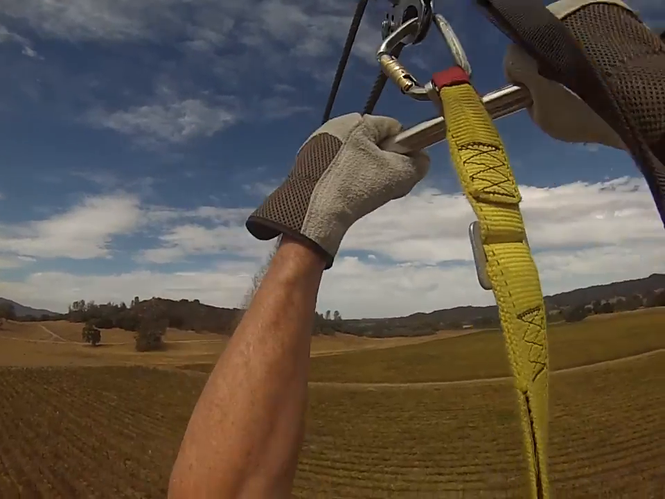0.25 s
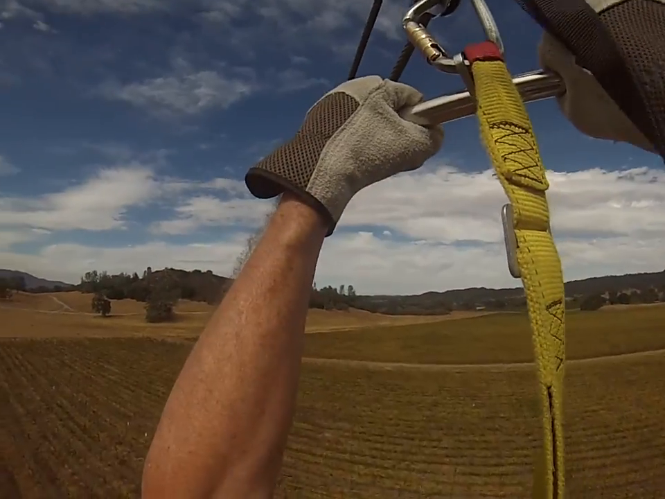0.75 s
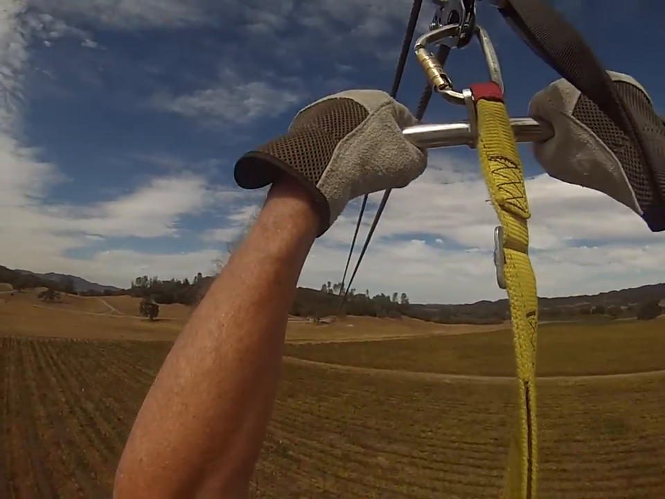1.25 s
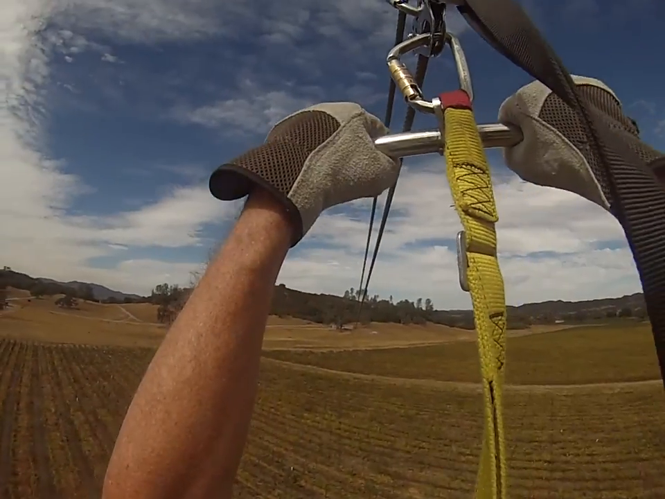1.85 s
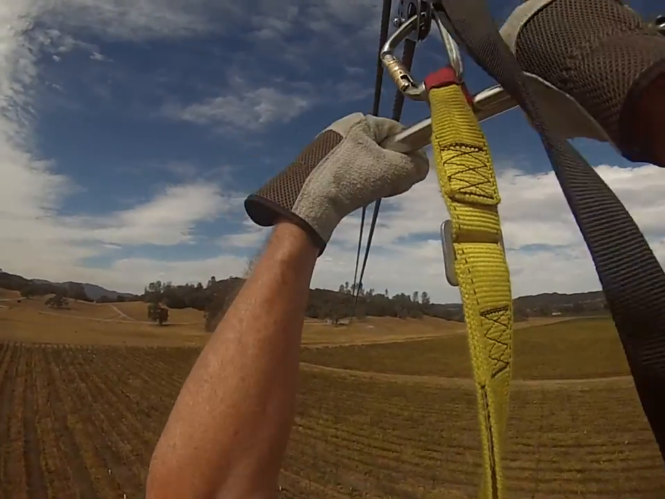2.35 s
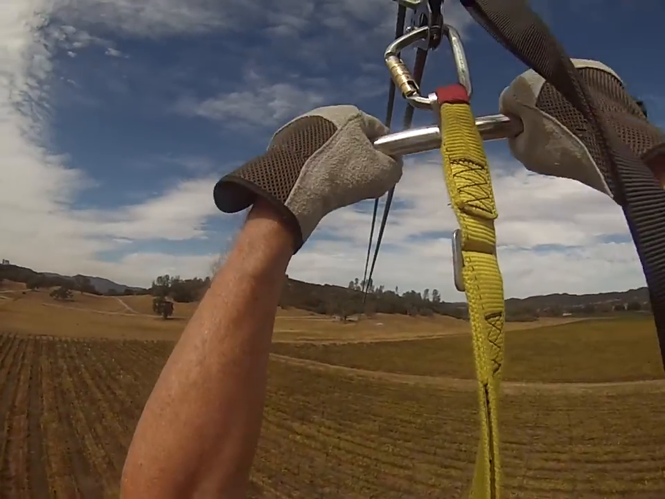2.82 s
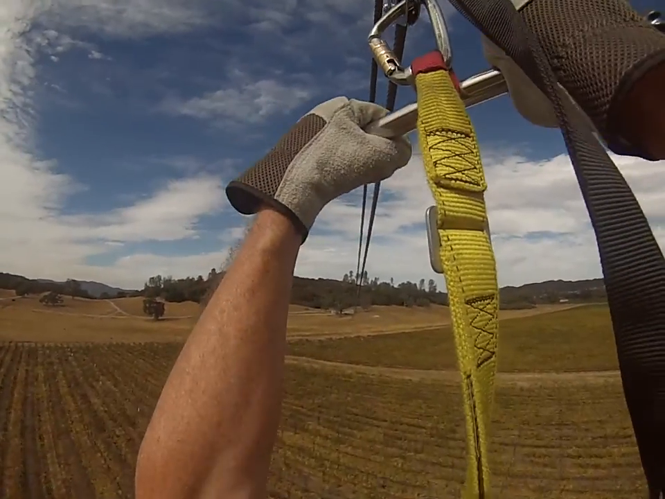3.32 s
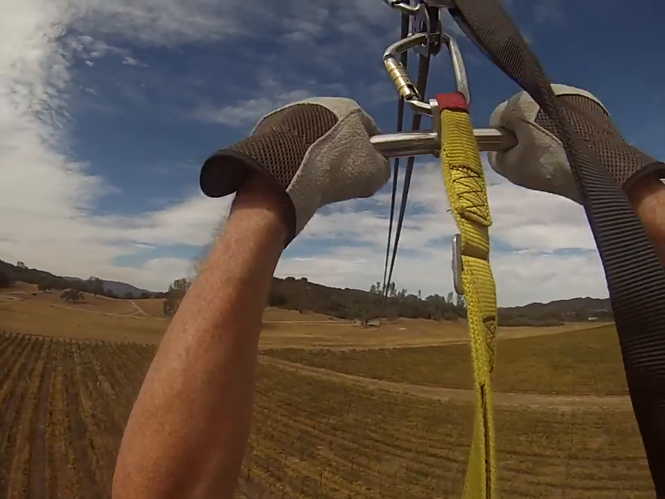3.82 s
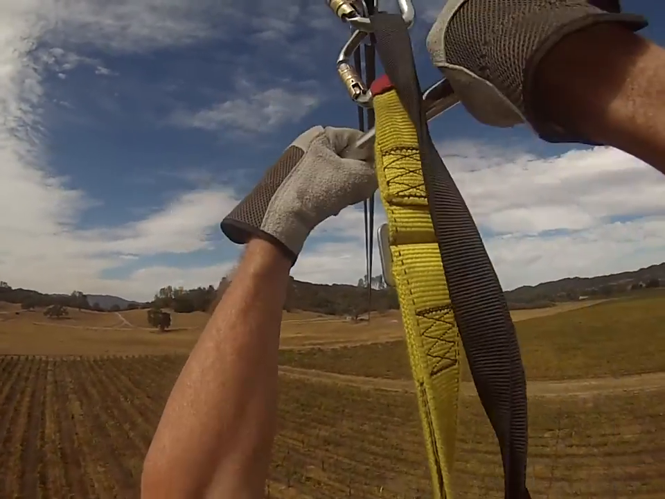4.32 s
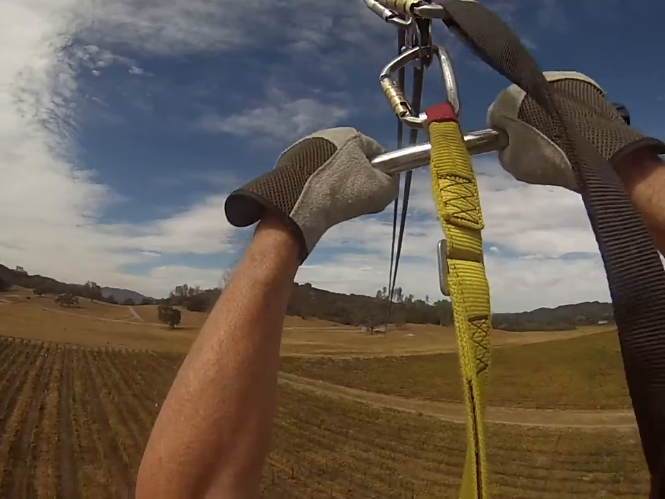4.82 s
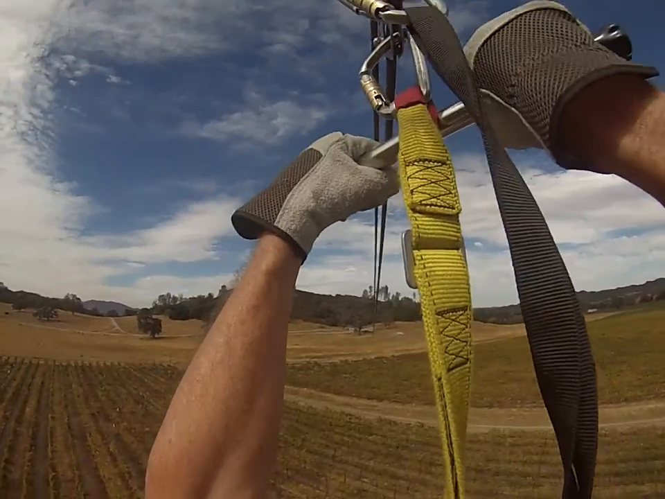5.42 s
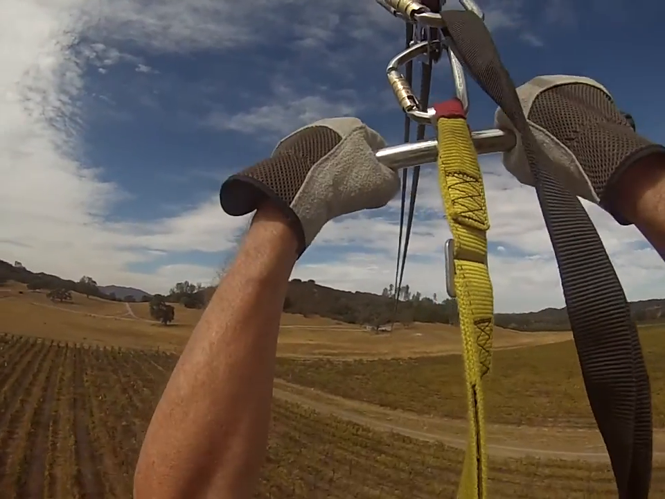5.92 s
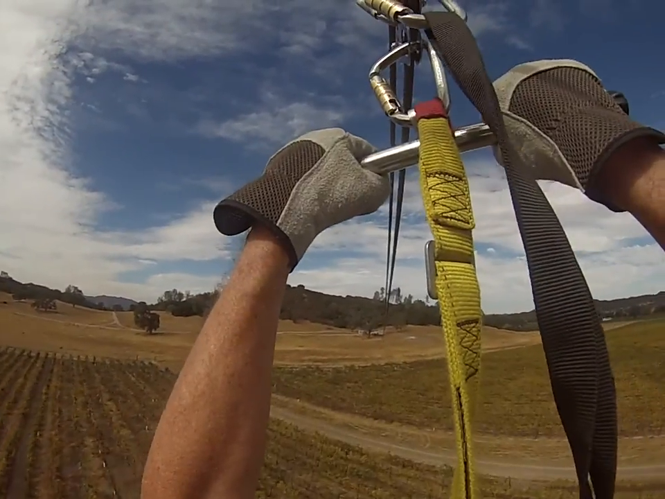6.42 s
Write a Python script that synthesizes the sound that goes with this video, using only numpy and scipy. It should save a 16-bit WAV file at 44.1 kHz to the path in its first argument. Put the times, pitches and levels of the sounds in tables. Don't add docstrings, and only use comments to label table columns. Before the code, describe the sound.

The sound begins already in motion: pulleys roll along a steel cable close overhead, giving a continuous bright, gritty hiss with a narrow metallic ring and airy sizzle above. It dips slightly after the start, with a brief harsher scrape around 0.3-0.45 s. Low wind buffets and soft thumps push the nearby microphone irregularly, with stronger rushes near 0.4 and 2.3 s. Loose parts rattle densely, with clear ticks around 0.5-1.2 s and a busy cluster at 2.3-2.9 s, then more scattered taps to 3.7 s. The rattling thins while the rolling grows firmer from about 3.7 s. A faint whine appears near 4.2-4.6 s. At 5.0 s a hard, dry knock cracks; everything ducks suddenly and swells back over about a second. Thin, trembling cable whine returns, clearest around 5.6, 6.2 and the end, as wind eases and rolling continues, cut off mid-ride. Open air, no reverberation, nearly mono.

```python
import sys
import numpy as np
from scipy import signal
from scipy.io import wavfile
from scipy.ndimage import uniform_filter1d

SR = 44100
rng = np.random.default_rng(int(sys.argv[2]) if len(sys.argv) > 2 else 0)


def gain_from_db(level_db):
    decades = np.asarray(level_db, float) / 20
    return 10 ** decades


def materialize(psi):
    bounded = np.clip(np.atleast_2d(psi).T, -1, 1)
    quanta = np.round(bounded * 32767).astype(np.int16)
    wavfile.write(sys.argv[1], SR, quanta)


N = 293706
TIME = np.arange(N) / SR


def trolley():
    # [t/s, pulley level/dB]
    load_rows = [(0, -16), (.2, -21.5), (.42, -19.5), (.6, -22), (.9, -19.5), (1.1, -20), (1.3, -18),
                 (1.6, -17.5), (2.05, -18.5), (2.55, -19.5), (2.8, -17.5), (3.1, -19.5), (3.75, -16.5),
                 (4.15, -17), (4.42, -18), (4.55, -16.5), (5.5, -17), (6.66, -16.5)]
    # [f/Hz, width/Hz, level/dB]
    pulley_modes = [(4165, 230, -17.5), (4552, 333, -6.5), (5083, 257, -4), (5745, 103, 0.5),
                    (6037, 360, -3.5), (6506, 350, -3.5), (6752, 134, -2.5)]
    sizzle_modes = [(7590, 690, 1), (8716, 440, 0), (9370, 930, -6)]
    air_modes = [(10920, 390, -3.5), (12020, 690, -2), (13600, 500, -7), (14300, 470, 0),
                 (15000, 500, -7.5)]
    # [t/s, length/s, lift/dB]
    turn_rows = [
        (.95, .6, 3),
        (2.7, .4, 1),
        (4.2, .3, -2.5),
        (5.6, .3, 2),
    ]
    # [from/s, to/s, treble lift/dB]
    scrape = (0.32, 0.45, 3.8)
    sizzle_db, sizzle_db_per_s = -12.5, 0.4
    air_db, air_share = -17.5, 0.53

    load_db = curve(load_rows)
    sizzle_gain = gain_from_db(sizzle_db + sizzle_db_per_s * TIME)
    air_gain = gain_from_db(air_db - air_share * (load_db - load_db.mean()) + spells(turn_rows))
    grit = grains(2500, 3.0) * waver(1.0, 30.02)
    treble = sizzle_gain * body(sizzle_modes, 0.6 * grit, 1.3, 9)
    treble = treble + air_gain * body(air_modes, 0.67 * grit, 2.0, 7)
    start_s, end_s, lift_db = scrape
    treble = treble * np.where((TIME > start_s) & (TIME < end_s), gain_from_db(lift_db), 1)
    return gain_from_db(load_db) * (body(pulley_modes, 0.57 * grit, 0.68, 13) + treble)


def loose():
    # [t/s, shell level/dB]
    shake_rows = [(0, -29), (.33, -32), (.55, -27), (1.11, -26.5), (1.52, -31.5), (2.05, -31), (2.3, -26),
                  (2.6, -26), (2.8, -28), (3.05, -26), (3.45, -27), (3.62, -31.5), (4.15, -31.5),
                  (4.3, -35.5), (4.6, -30.5), (5.1, -33.5), (5.9, -32), (6.66, -32.5)]
    # [f/Hz, width/Hz, level/dB]
    shell_modes = [(1162, 110, -12.5), (1533, 250, -2.5), (1940, 340, -9)]
    plate_modes = [(2175, 320, -11), (2370, 370, -6.5), (2630, 210, -1), (2930, 160, -6), (3175, 298, 3.5),
                   (3515, 176, -3.5)]
    # [t/s, length/s, lift/dB]
    rocking_rows = [
        (.14, .15, 3),
        (1.35, .3, .6),
        (1.8, .6, -2.5),
        (2.35, .15, 2),
        (3.05, .15, -1.5),
        (3.9, .3, -2),
        (4.3, .2, 2),
        (4.6, .2, 2),
        (5.1, .3, -1),
        (6.5, .3, 2),
    ]
    plates_db, plates_share = -30.5, 0.43

    shake_db = curve(shake_rows)
    shell_gain = gain_from_db(shake_db)
    plate_gain = gain_from_db(4.5) * gain_from_db(plates_db + plates_share * (shake_db + 29) + spells(rocking_rows))
    rattle = grains(500, 2.7) * waver(1.7, 25.13)
    shell = shell_gain * body(shell_modes, 0.75 * rattle, 1.3, 18)
    return shell + plate_gain * body(plate_modes, 0.69 * rattle, 1.47, 16)


def ticks():
    # [t/s, peak/dB, plate ring re shell/dB]
    tick_rows = [(0.3905, -13, -5), (0.5094, -4.5, -5), (0.6561, -13, -3), (0.7233, -8, -3), (1.061, -6, 0),
                 (1.224, -8, -1), (2.2613, -12, -1), (2.374, -14, -3), (2.403, -5, -6), (2.4788, -4, -9),
                 (2.531, -5, -8), (2.579, -3, -4), (2.6304, -14, -7), (2.6477, -3, 0), (2.68, -7, 0),
                 (2.8727, -3.5, -7), (3.2076, -8, -6), (3.3272, -4, -9), (3.423, -9, -3), (3.511, -6, -7),
                 (3.6095, -6, -5), (3.6486, -9, -3), (4.0424, -11, -1), (4.4433, -11, -1), (4.624, -7, -5),
                 (4.839, -9, -6), (5.946, -10, -3), (6.0232, -7.5, -5), (6.321, -9.5, -7)]
    s, db, plate_db = np.transpose(tick_rows)
    shell = struck(zip(s, db - 8.0), [(1518, 0.5, 0.03), (1656, -9, 0.057)])
    plates = struck(zip(s, db + plate_db - 6.0), [(3220, -1.0, .012), (2700, -13, .012)])
    return ring(shell, 1410, 600) + ring(plates, 2700, 1200)


def knock():
    # [t/s, level/dB]
    bounce_rows = [
        (4.9932, -4),
        (4.9937, -3),
        (4.9941, -8),
    ]
    # [f/Hz, level/dB, t60/s]
    knock_modes = [(1520, 0, .016), (2724, -19, .05), (3300, -4, .006), (4900, -11, .004), (6342, -8, .006),
                   (7500, -7, .005), (9500, -9, .003), (11500, -2.5, .003), (14800, -3, .003)]
    return -gain_from_db(9.7) * struck(bounce_rows, knock_modes)


def whine():
    # [t/s, rate/Hz]
    strand_rows = [
        (0, 1038),
        (4.2, 1048),
        (4.62, 1056),
        (5.05, 1045),
        (5.42, 1075),
        (6.25, 1079),
        (6.66, 1091),
    ]
    # [multiple, level/dB]
    order_rows = [(1, -23), (2, -11), (3, 0)]
    # [t/s, length/s, lift/dB]
    singing_rows = [
        (4.25, .25, 11),
        (4.62, .3, 13),
        (5.2, .3, 10),
        (5.62, .45, 19),
        (6.22, .3, 16),
        (6.58, .25, 23),
    ]
    rate_hz = curve(strand_rows) * (1 + .0025 * walk(30))
    phase = 2 * np.pi * np.cumsum(rate_hz) / SR
    tone = sum(gain_from_db(order_db + 3 * walk(22)) * np.sin(k * phase) for k, order_db in order_rows)
    return tone * gain_from_db(-45 + spells(singing_rows))


def wind():
    # [t/s, rush level/dB]
    gust_rows = [(0, -31), (.42, -24.5), (.7, -33), (1.2, -30), (1.4, -34.5), (1.7, -31.5), (2.17, -31),
                 (2.28, -22.5), (2.42, -30), (2.85, -31), (3.17, -27), (3.5, -31), (3.7, -34), (4.25, -35),
                 (4.45, -32.5), (5, -32.5), (5.9, -34), (6.66, -37.5)]
    # [t/s, length/s, buffet lift/dB, thump lift/dB]
    eddy_rows = [(0.033, .1, 10, 8), (0.24, 0.21, 9.5, 0), (.55, 0.22, 1.5, 6), (0.984, 0.55, 6.5, 1),
                 (1.254, .1, 4, 4), (1.55, .1, 2, 6), (1.733, 0.34, 10, -7), (2.08, 0.14, 7, 1),
                 (2.365, .2, 8, -3), (2.6, 0.14, 3, 4), (3, .25, 1.5, 9.5), (3.302, 0.28, 1, 7.5),
                 (3.477, 0.12, 5, 5), (3.735, 0.24, 5.5, 4), (4.047, 0.18, -5, 4), (4.433, .12, 5, 5),
                 (4.7, 0.22, 5, 5), (5.2, 0.24, 2, 3), (5.56, 0.09, 2, 0), (6, .25, 7, -7),
                 (6.3, 0.17, 2, 7)]
    # [f/Hz, width/Hz, level/dB]
    thump_modes = [(30.3, 32, -8.5), (47, 21.6, -4.5)]
    buffet_modes = [(66.1, 18.2, 5.5), (80, 30, -7.5)]
    flutter_modes = [(103.7, 29.5, 1), (128, 32, -5)]
    rush_modes = [(190.5, 77, 0.5), (305.6, 90, -2), (589, 163, -10.5), (910, 480, -25)]

    gust_db = curve(gust_rows)
    eddies = np.array(eddy_rows)
    excess_db = gust_db + 31.5
    thump_gain = gain_from_db(-30.5 + 0.37 * excess_db) * gain_from_db(spells(eddies[:, [0, 1, 3]]))
    buffet_gain = gain_from_db(-27.5 + 0.69 * excess_db) * gain_from_db(spells(eddies[:, :3]))
    flutter_gain = gain_from_db(-28 + 0.76 * excess_db)
    gusts = grains(90, 1.7)
    thump = thump_gain * body(thump_modes, 0.19 * gusts, .4, 11)
    membrane = np.tanh(0.35 * body(buffet_modes, 0.17 * gusts, .4, 4.0))
    flutter = flutter_gain * body(flutter_modes, 0.3 * gusts, 1.5, 6)
    rush = gain_from_db(gust_db) * body(rush_modes, 0.6 * gusts, 1.6, 6)
    return thump + buffet_gain * unit(membrane) + flutter + rush


def body(modes, clicks, flicker_db, rate_hz):
    out = np.zeros(N)
    for hz, width_hz, db in modes:
        force = waver(flicker_db, rate_hz) * rng.standard_normal(N, dtype=np.float32) + clicks
        section = np.concatenate(signal.iirpeak(hz, hz / (1.444 * width_hz), fs=SR))
        out += gain_from_db(db) * waver(0.84, 3.017) * signal.sosfilt([section, section], force)
    return unit(out)


def struck(hits, modes):
    t = np.arange(4096) / SR
    shape = sum(gain_from_db(db) * np.sin(2 * np.pi * hz * t) * 1000. ** (-t / t60) for hz, db, t60 in modes)
    force = np.zeros(N)
    for s, db in hits:
        force[int(s * SR)] += gain_from_db(db)
    return signal.fftconvolve(force, shape)[:N]


def ring(x, hz, width_hz):
    return signal.lfilter(*signal.iirpeak(hz, hz / width_hz, fs=SR), x)


def grains(rate_hz, spread_db):
    rare_db = spread_db * np.minimum(rng.exponential(size=N), 3.4)
    size = gain_from_db(rare_db) * rng.standard_normal(N)
    return unit(size * (rng.random(N) < rate_hz / SR))


def unit(x):
    return x / np.sqrt(np.mean(x ** 2))


def steps(rate_hz):
    levels = rng.standard_normal(int(N * rate_hz / SR) + 2)
    return unit(uniform_filter1d(np.repeat(levels, 8), size=12))


def stretch(fine, rate_hz):
    return np.interp(TIME * rate_hz * 8, np.arange(len(fine)), fine)


def walk(rate_hz):
    return stretch(steps(rate_hz), rate_hz)


def waver(db, rate_hz):
    return stretch(gain_from_db(db * steps(rate_hz)), rate_hz)


def curve(rows):
    return np.interp(TIME, *np.transpose(rows))


def spells(rows):
    t = TIME[::64]
    swell = sum(height * np.exp(-(2 * (t - s) / length_s) ** 2) for s, length_s, height in rows)
    return np.interp(TIME, t, swell)


def limiter():
    duck_s, attack_s, duck_db = 4.9872, .0022, -11.5
    recover_s, bend = 0.68, 1.57
    since_s = np.maximum(TIME - duck_s, 0)
    return gain_from_db(duck_db * np.minimum(since_s / attack_s, 1) * np.exp(-(since_s / recover_s) ** bend))


def scene():
    # [t/s, level re trolley/dB]
    spread_rows = [
        (.115, -17),
        (.975, -12),
        (1.255, -15),
        (1.715, -24),
        (5.74, -10),
        (5.9, -15),
    ]
    hits = ticks() + knock()
    hits = signal.sosfilt(signal.butter(4, 1150, "high", fs=SR, output="sos"), hits)
    steel = trolley()
    mono = steel + loose() + wind() + whine() + hits
    treble = signal.butter(6, 6500, "high", fs=SR, output="sos")
    side = unit(signal.sosfilt(treble, np.roll(steel, 999))) * np.std(steel)
    side = side * sum(gain_from_db(db + 5) * np.exp(-((TIME - s) / 0.0058) ** 4) for s, db in spread_rows)
    return np.array([mono + side, mono - side])


def top_cut(x):
    return signal.sosfilt(signal.butter(12, 15310, fs=SR, output="sos"), x)


def record(dry):
    rounded = np.tanh(0.62 * dry * limiter()) / 0.58
    return top_cut(rounded)


dry = scene()
out = record(dry)
materialize(out)
```